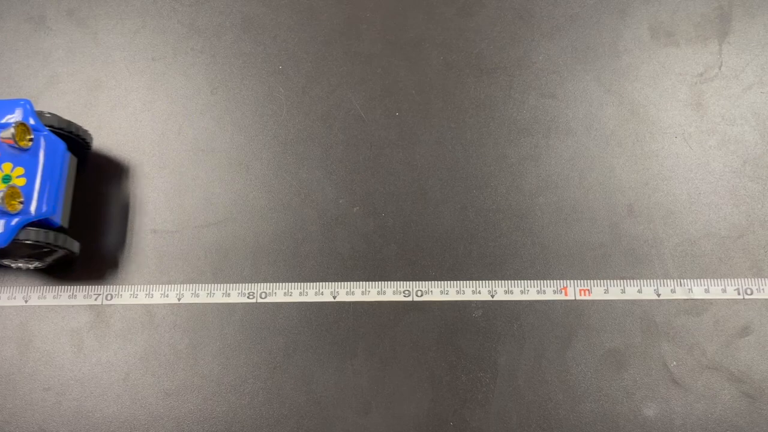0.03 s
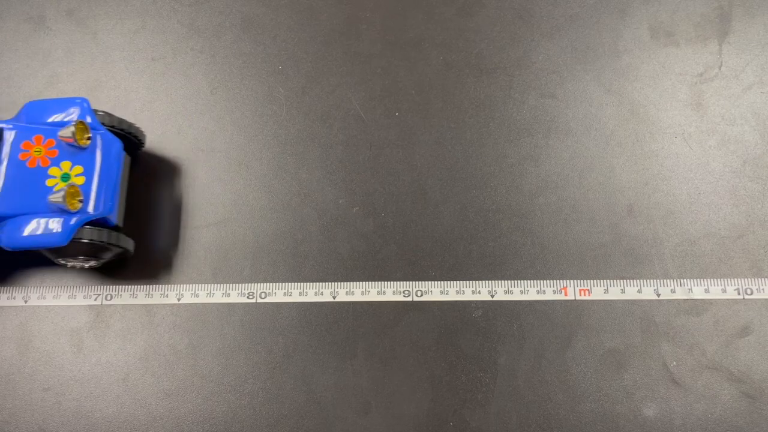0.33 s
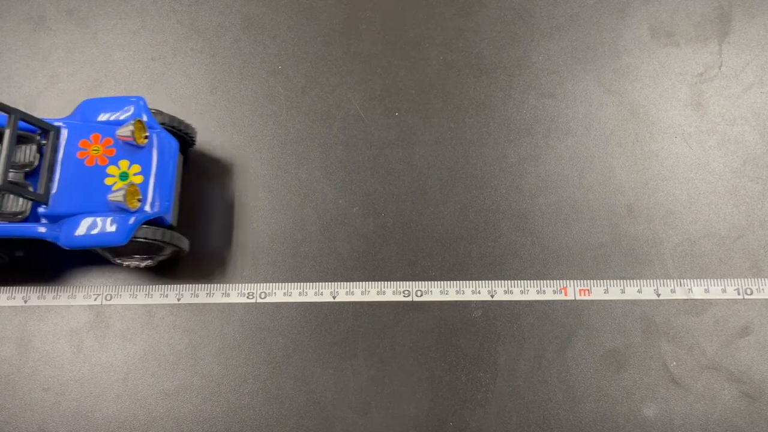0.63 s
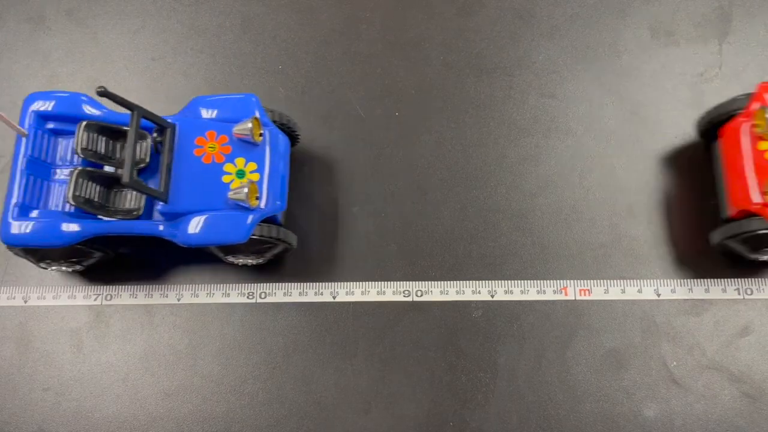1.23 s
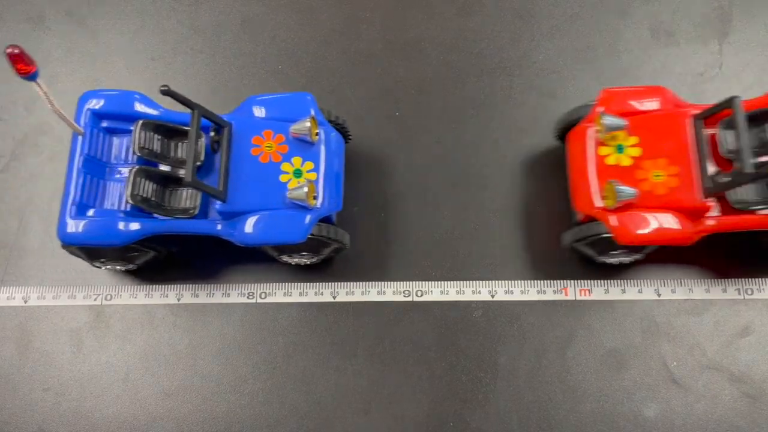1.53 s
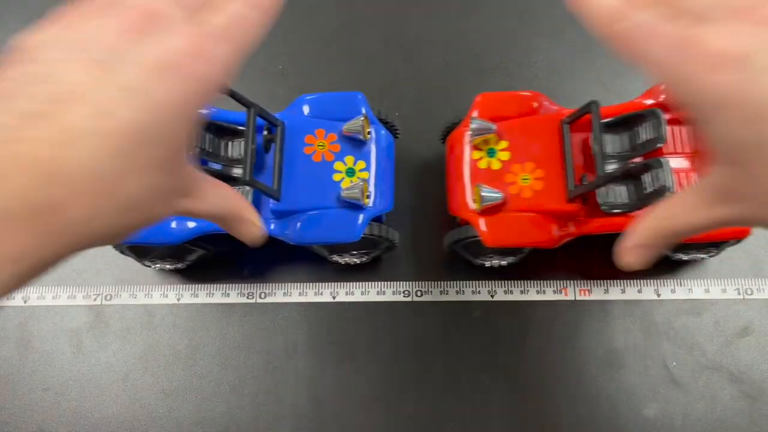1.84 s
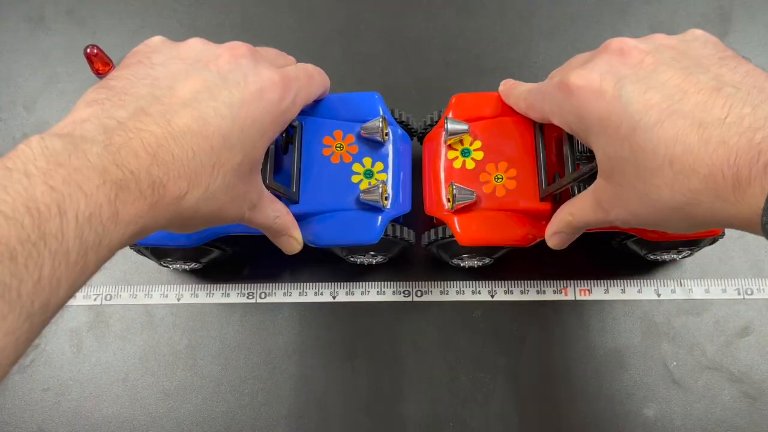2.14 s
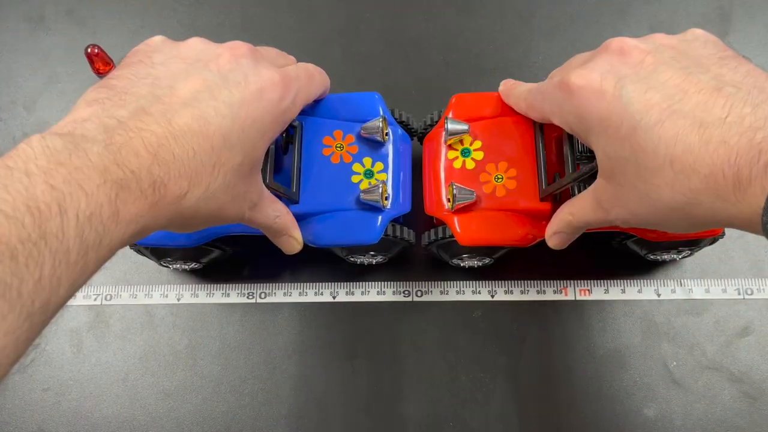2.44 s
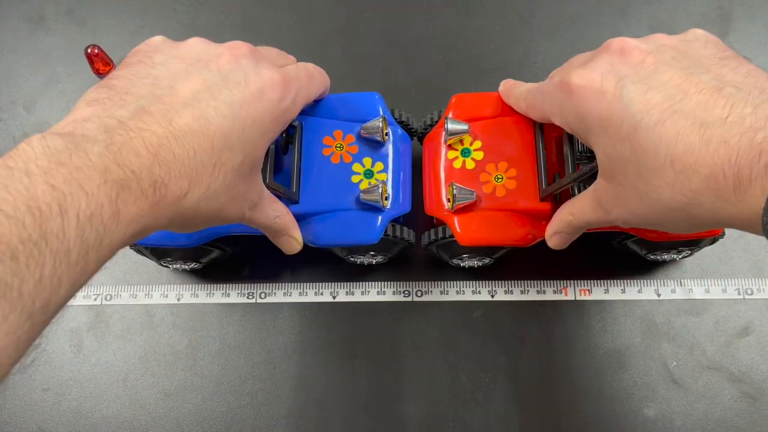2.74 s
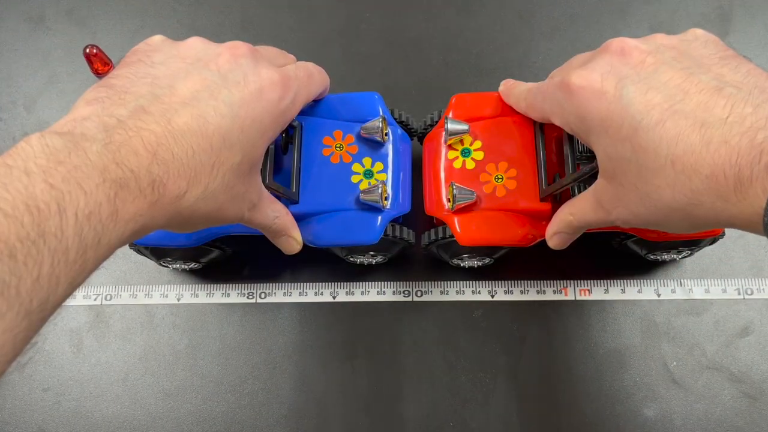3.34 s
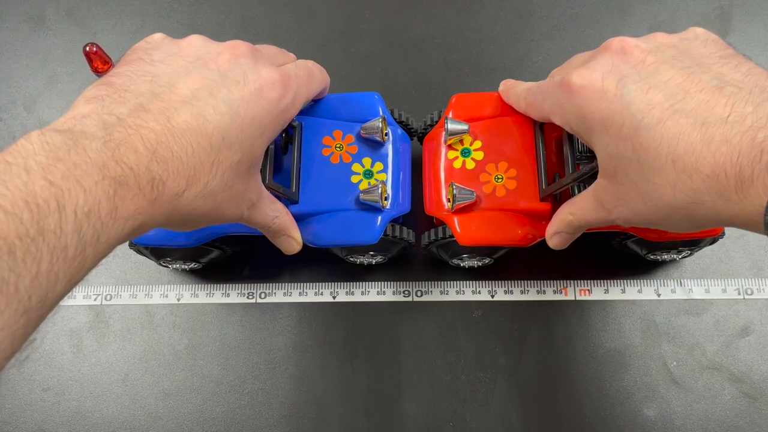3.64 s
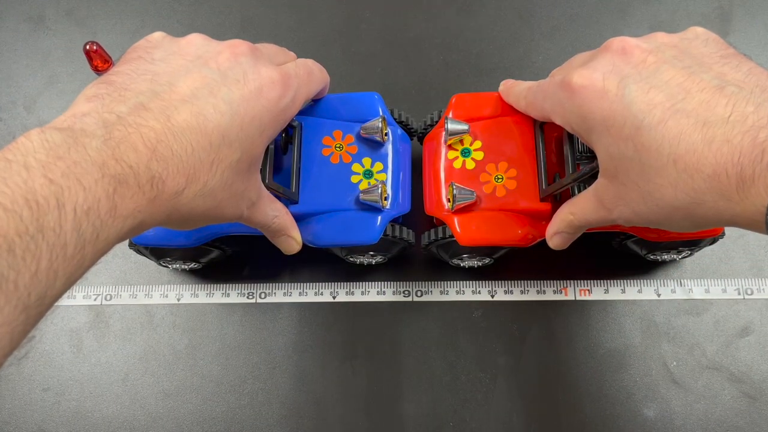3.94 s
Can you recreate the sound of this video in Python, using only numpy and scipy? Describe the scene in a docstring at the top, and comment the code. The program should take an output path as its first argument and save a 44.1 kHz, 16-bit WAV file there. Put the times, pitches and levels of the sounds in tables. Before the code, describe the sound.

A motorised toy car whirs in from the left along a table, close by, with rasping gears, drumming wheels and brief plastic rattles. From about 1 second a second, faster car joins with a wavering whine. Two short squeals come near 1.9 seconds, and just after 2 seconds a dull knock stops both. A distant machine's low throb runs throughout, remaining with faint room rumble until nearly 4 seconds.

```python
"""A table top indoors, stereo microphone close above it: two plastic toy buggies whir towards each other. Their
gears tick and rasp into the hollow bodies, loose parts rattle and a flywheel rumbles low. Just after 2 s hands
stop both with a knock. Further off, the low throb of a slow machine fills the room throughout."""
import sys
import numpy as np
from scipy import signal
from scipy.fft import rfft, irfft
from scipy.io import wavfile
from scipy.ndimage import uniform_filter1d, map_coordinates

SR = 44100
rng = np.random.default_rng(int(sys.argv[2]) if len(sys.argv) > 2 else 0)


def master(y):
    """Save y as 16-bit WAV."""
    cut = np.clip(np.atleast_2d(y).T, -1, 1)
    pcm = np.round(cut * 32767)  # scale
    wavfile.write(sys.argv[1], SR, pcm.astype(np.int16))


N = 176400

# sound arriving from below the microphone: f/Hz, phase lead of the left/rad, left minus right/dB
FROM_BELOW = [(950, -.2, 2), (1290, 1.3, -1), (1800, 0.41, -1.5), (2800, -0.74, 6.5), (3740, -0.17, 0)]


def undb(db):
    return 10 ** (np.asarray(db) / 20)


def unit(x):
    """Scale to rms 1."""
    return x / np.sqrt(np.mean(x ** 2))


def curve(rows, column=1):
    """One column of a table, joined by straight lines in time."""
    rows = np.array(rows)
    return np.interp(np.arange(N) / SR, rows[:, 0], rows[:, column])


def walk(rate_hz):
    """Smooth random drift with a spread near 1."""
    hold = max(int(SR / rate_hz), 1)
    steps = np.repeat(rng.standard_normal(N // hold + 1), hold)
    return 1.3 * uniform_filter1d(uniform_filter1d(steps, hold), hold)[:N]


def lowpass(x, hz):
    return signal.sosfilt(signal.butter(2, hz, fs=SR, output="sos"), x)


def colour(x, spectrum, resonances=()):
    """Causal filter of unit power gain: a broad spectrum plus resonances."""
    f, points = np.fft.rfftfreq(2 * N, 1 / SR), np.array(spectrum)
    db = np.interp(np.log(f + 1), np.log(points[:, 0]), points[:, 1])
    for hz, width, lift in resonances:
        db = db + lift / (1 + (2 * (f - hz) / width) ** 2)
    cepstrum = irfft(np.log(unit(undb(db))))
    fold = np.r_[1, np.full(N - 1, 2), np.zeros(N)]  # makes the filter minimum phase
    return irfft(rfft(x, 2 * N) * np.exp(rfft(cepstrum * fold)))[..., :N]


def pan(db):
    """Left and right gains for a level difference."""
    return undb(np.array([[db], [-db]]) / 2)


def stereo_image(x, rows):
    """Give the left side a phase lead and a level difference, both by frequency."""
    hz, radians, db = np.array(rows).T
    f = np.fft.rfftfreq(2 * N, 1 / SR)
    side = np.array([[.5], [-.5]])
    lead = np.exp(1j * np.interp(f, hz, radians) * side)
    gain = undb(np.interp(f, hz, db) * side)
    mirrored = np.concatenate([x, x[..., ::-1]], axis=-1)
    return irfft(rfft(mirrored) * lead * gain)[:, :N]


def reflect(x, wet_db, t60, dull_hz):
    """Add short, duller reflections from the table and walls, different on each side."""
    t = np.arange(SR // 4) / SR
    tail = rng.standard_normal((2, len(t))) * np.exp(-np.log(1000) * t / t60)
    tail = lowpass(tail / np.sqrt(np.sum(tail ** 2) / 2), dull_hz)
    return x + undb(wet_db) * signal.fftconvolve(x[None], tail, axes=1)[:, :N]


def room_tone():
    """A rumble of air all around the microphone, wider above the bass."""
    # spectrum of the air: f/Hz, relative level/dB
    air_spectrum = [(20, -30.5), (30, -4), (60, 1.5), (95, -4), (150, 0.5), (260, -13.5), (450, -20),
                    (600, -30.5), (1200, -37), (2800, -44.5), (4500, -59), (15000, -83)]
    mid, side = undb(-41) * colour(rng.standard_normal((2, N)), air_spectrum)
    side = signal.sosfilt(signal.butter(1, 260, "high", fs=SR, output="sos"), side) * undb(-1)
    return mid + side * np.array([[1], [-1]])


def machine():
    """A slow machine somewhere in the building: a few low, soft booms on every stroke, and a faint hum."""
    # what each stroke sets booming: f/Hz, width/Hz, lag/s, level/dB
    booms = [(75.3, 6.4, -0.0277, -42), (118.57, 8.45, 0, -31), (139, 32.8, -0.0075, -50)]
    stroke_hz, first_stroke_s = 11.298, .03
    t = np.arange(N) / SR - first_stroke_s
    throb = sum(undb(db) * np.exp(-((f - hz) / width) ** 2) * np.cos(2 * np.pi * f * (t - lag))
                for hz, width, lag, db in booms for f in stroke_hz * np.arange(5, 18))
    hum = undb(-67) * np.sin(2 * np.pi * 399 * t + walk(5.8))
    return (throb + hum) * pan(db=-3)


def flywheel():
    """A flywheel or motor shaft in the toys turns near 50 Hz and keeps up a low, wavering rumble."""
    # rumble of the turning shaft: t/s, level/dB
    rumbling = [(0, -32), (.3, -35), (.385, -43), (.47, -32), (.75, -33), (.86, -42), (.95, -32),
                (1.25, -39), (1.5, -36), (1.72, -54), (1.97, -36.5), (2.06, -38), (2.15, -67.5)]
    shaft_hz, width_hz = 50, 7
    tone = np.sin(2 * np.pi * np.cumsum(shaft_hz + 1.3 * walk(7.4)) / SR)
    spectrum = [(15, -52.5), (45, -0.5), (200, -15), (500, -46), (2000, -84)]  # f/Hz, relative level/dB
    rumble = colour(rng.standard_normal(N), spectrum, [(shaft_hz, width_hz, 6)])
    return unit(unit(tone) + undb(-5.5) * rumble) * undb(curve(rumbling)) * pan(db=-0.5)


def rattles():
    """Loose plastic parts chatter in brief clusters of tiny impacts."""
    # clusters: t/s, level/dB, rise and decay time/s
    clusters = [(0.1247, -30.5, 0.0019), (0.478, -33.5, 0.0028), (0.484, -36.5, .002), (0.877, -31, 0.0034),
                (0.898, -33.5, 0.0015), (1.125, -37.5, 0.007), (1.326, -32, 0.0012),
                (1.3347, -28.5, 0.0019), (2.067, -44.5, 0.00075), (2.082, -46.5, .002)]
    # spectrum of the loose parts: f/Hz, relative level/dB
    parts_spectrum = [(300, -18), (1000, -1), (2400, 3), (6000, -1.5), (8500, -10.5), (15000, -13)]
    t = np.arange(N) / SR
    bursts = sum(undb(db) * np.exp(-abs(t - s) / decay) for s, db, decay in clusters)
    chatter = unit(rng.standard_normal(N) * undb(walk(3000)))
    return reflect(colour(bursts * chatter, parts_spectrum), wet_db=-1, t60=0.13, dull_hz=5060)


def squeals():
    """Short, falling squeals of plastic as the buggies meet below the microphone."""
    # each squeal at its peak: t/s, f/Hz, level/dB
    peaks = [(1.895, 1853, -36), (1.969, 1223, -37.5)]
    half_length_s, fall_per_s = 0.035, 1.5  # the fall is a share of the pitch
    out = 0
    for s, hz, db in peaks:
        t = np.arange(N) / SR - s
        phase = 2 * np.pi * hz * (t - fall_per_s * t ** 2 / 2)
        out = out + undb(db) * np.exp(-(t / half_length_s) ** 2) * np.sin(phase + .5 * walk(230))
    return stereo_image(out, FROM_BELOW)


def knocks():
    """Dull plastic knocks, damped at once by the hands that stop the buggies."""
    # impacts: t/s, level/dB
    impacts = [(2.0504, -17.5), (2.084, -38), (2.095, -35.5)]
    knock_hz, rise_s, decay_s = 1220, 0.00067, 0.00046
    taps = 0
    for s, db in impacts:
        t = np.arange(N) / SR - s
        envelope = undb(db) * np.exp(-np.maximum(-t / rise_s, t / decay_s))
        taps = taps - envelope * np.cos(2 * np.pi * knock_hz * t)
    return reflect(taps, wet_db=-10, t60=0.066, dull_hz=3000) * pan(db=-1)


def flicker(x, depth_db, rate_hz):
    """Each part of the spectrum above the bass swells and sinks by itself."""
    spectrum, octave = rfft(x), np.log2(np.fft.rfftfreq(N, 1 / SR) + 1)
    centres = np.linspace(9, 13, 17)  # quarter octaves from 512 to 8192 Hz
    bands = (irfft(spectrum * np.interp(octave, centres, peak), N) for peak in np.eye(len(centres))[1:-1])
    return x + sum(band * (undb(depth_db * walk(rate_hz)) - 1) for band in bands)


def moving_echoes(x, echo_db, drift_s_per_s, dull_hz):
    """Echo paths on each side lengthen or shorten as a buggy rolls, so its colour glides."""
    per_side, near_s, far_s = 6, 0.002007, .012
    t = np.arange(N) / SR
    dull = lowpass(x, dull_hz)
    out = np.array([x, x])
    for k, (lag, drift) in enumerate(rng.random((2 * per_side, 2))):
        delay = near_s + (far_s - near_s) * lag + drift_s_per_s * (2 * drift - 1) * t
        out[k % 2] += undb(echo_db) / np.sqrt(per_side) * np.interp(t - delay, t, dull)
    return out


def mesh_whine(drive, orders, level_db, flutter_db):
    """Wavering tones at high multiples of the shaft rate flare up in turn and sink as the drive slows."""
    phase = 2 * np.pi * np.cumsum(curve(drive) * (1 + 0.0095 * walk(25))) / SR
    tones = sum(np.sin(k * phase + 1.3 * walk(90)) * undb(flutter_db * np.tanh(walk(23.07)))
                for k in orders)
    return unit(tones) * undb(curve(drive, column=2) + level_db)


def gears(drive, tick_db, repeat_db, grit_db, wobble):
    """Teeth snap into mesh; their rough flanks rasp, partly alike on every turn of the shaft."""
    teeth, scatter_db, snap_share, points = 4, 3, 0.21, 1024
    turns = np.cumsum(curve(drive) * (1 + wobble * walk(12))) / SR
    flanks = map_coordinates(rng.standard_normal(points), [turns * points], order=3, mode="grid-wrap")
    grit = unit(rng.standard_normal(N) * undb(grit_db * walk(1800)))
    rasp = unit(undb(repeat_db) * flanks + grit)
    tooth = turns * teeth
    strength = undb(scatter_db * rng.standard_normal(points))[tooth.astype(int) % points]
    snap = undb(tick_db) * strength * np.exp(-(tooth % 1) / snap_share)
    return unit(rasp * (1 + snap)) * undb(curve(drive, column=2))


def red_buggy():
    """The red buggy runs faster, and its gears whine as well as rasp through its shell."""
    # gear drive: t/s, shaft rate/Hz, relative level/dB
    drive = [(.6, 68, -60), (1.02, 70.6, -50), (1.11, 68, -44), (1.57, 62.2, -40.5), (1.68, 53, -44),
             (1.75, 56, -35.5), (1.82, 62, -37.5), (1.99, 56.6, -34.5), (2.035, 43, -42), (2.07, 22.2, -71),
             (2.13, 15, -79)]
    # spectrum of the hollow body: f/Hz, relative level/dB
    body = [(200, -37.5), (550, -11.5), (900, 0), (1230, 3.5), (1500, -2.5), (1900, 2), (2600, -6.5),
            (3500, -1.5), (4400, -7), (5200, -20.5), (6100, -11), (7300, -24.5), (14000, -23)]
    # shell resonance: f/Hz, width/Hz, lift/dB
    resonances = [(2970, 210, 11)]
    shell = colour(gears(drive, tick_db=-5.5, repeat_db=-2, grit_db=5, wobble=.003), body, resonances)
    whine = colour(mesh_whine(drive, orders=range(15, 72, 3), level_db=-9, flutter_db=10.5), body)
    whir = flicker(shell, depth_db=2.5, rate_hz=28) + whine
    return moving_echoes(whir, echo_db=-4, drift_s_per_s=0.00117, dull_hz=5850)


def blue_buggy(resonances):
    """The blue buggy's gear train sounds through its plastic shell."""
    # gear drive: t/s, shaft rate/Hz, relative level/dB
    drive = [(0, 58, -34), (.17, 52.3, -39), (.31, 51.6, -36.5), (.6, 47.2, -38), (1.1, 45.2, -37.5),
             (1.5, 45.6, -37), (1.75, 41.3, -37.5), (2.0, 34.7, -43), (2.05, 19.6, -61), (2.2, 11, -79.5)]
    # spectrum of the hollow body: f/Hz, relative level/dB
    body = [(200, -19), (550, -13), (850, 0.5), (1280, 0.5), (1700, -1.5), (2150, 0), (2750, -4),
            (3800, -8.5), (5100, -13), (6300, -8.5), (8500, -20), (11000, -15), (14000, -22.5)]
    shell = colour(gears(drive, tick_db=-5, repeat_db=-9, grit_db=2.5, wobble=.004), body, resonances)
    whir = flicker(shell, depth_db=1.75, rate_hz=20)
    return moving_echoes(whir, echo_db=-4, drift_s_per_s=.0007, dull_hz=6500)


def buggies():
    """The blue buggy rolls in from far left and brightens under the microphone, where the red meets it."""
    # blue shell's resonances, heard from afar and close up: f/Hz, width/Hz, lift/dB
    far_resonances = [(2950, 530, 4.5)]
    near_resonances = [(1900, 88, 6.8), (4570, 600, 8.1)]
    # sound arriving from the left: f/Hz, phase lead of the left/rad, left minus right/dB
    from_left = [(397, 0.5, 4.5), (950, 1.8, 0.5), (1210, 2, -1), (1820, 4.5, 2.5), (2180, 3.5, 8.5),
                 (2750, 7.5, 4), (4000, 6, -0.5)]
    leaves_s, arrives_s = 0.45, 1.66
    crossfade = np.pi / 2 * np.interp(np.arange(N) / SR, [leaves_s, arrives_s], [0, 1])
    far = blue_buggy(far_resonances) * np.cos(crossfade)
    near = blue_buggy(near_resonances) * np.sin(crossfade) + red_buggy()
    return (stereo_image(far, from_left) + stereo_image(near, FROM_BELOW)) * undb(-3)


def scene():
    """The toys close up, their faint return from the walls, and the low sounds of flywheel and room."""
    toys = buggies() + squeals() + rattles() + knocks()
    mono = toys.mean(axis=0)
    walls = reflect(mono, wet_db=-22, t60=.3, dull_hz=5000) - mono
    return toys + walls + flywheel() + machine() + room_tone()


def record(dry):
    """The microphone's sides differ in phase in the treble; the sound cuts in and the top is cut off."""
    # phase between the microphone's sides: f/Hz, lead of the left/rad
    treble_phase = [(5500, 0), (6800, 1.3), (7800, 3.0), (8700, 3.3), (10500, 6.2), (12500, 6.3),
                    (14000, 9.4)]
    start_s, fade_s, top_hz = 0.036, 0.012, 15500
    wide = stereo_image(dry, [(hz, radians, 0) for hz, radians in treble_phase])
    fade_in = np.clip((np.arange(N) / SR - start_s) / fade_s, 0, 1)
    return signal.sosfilt(signal.ellip(10, .2, 80, top_hz, fs=SR, output="sos"), wide * fade_in)


dry = scene()
out = record(dry)
master(out)
```